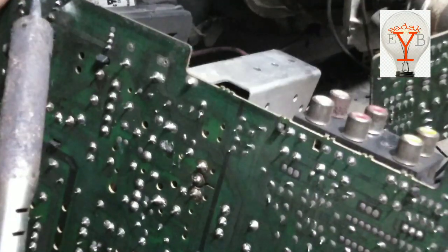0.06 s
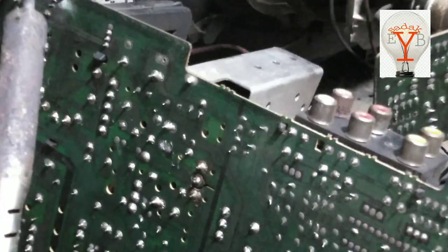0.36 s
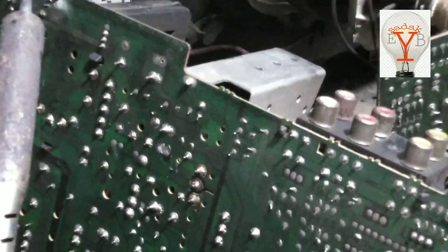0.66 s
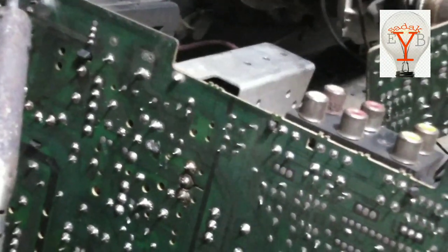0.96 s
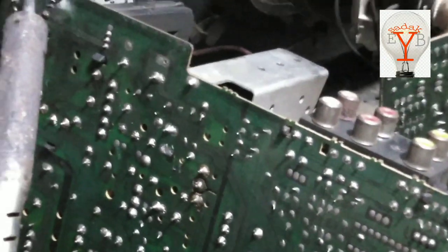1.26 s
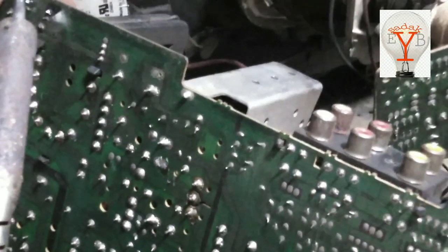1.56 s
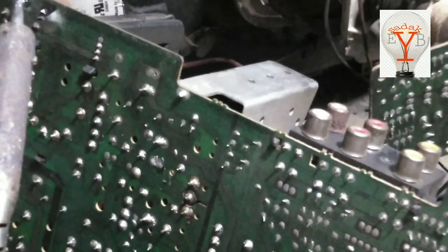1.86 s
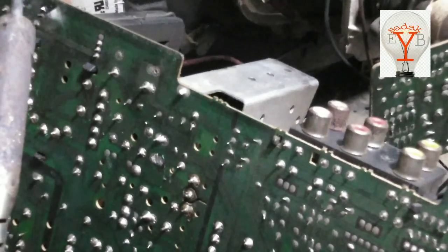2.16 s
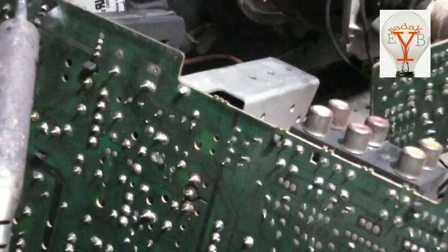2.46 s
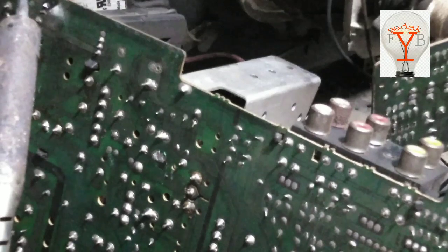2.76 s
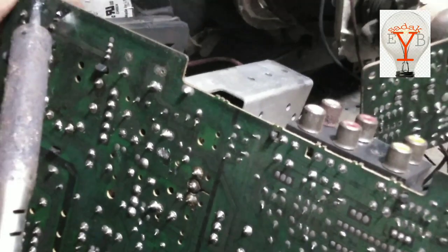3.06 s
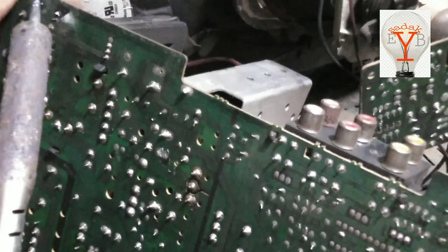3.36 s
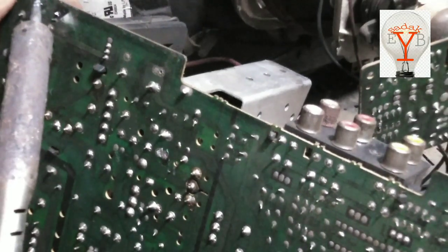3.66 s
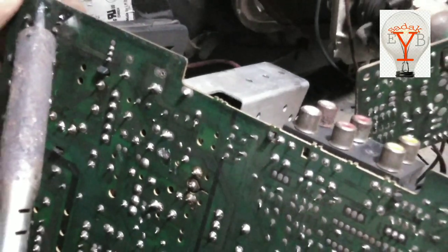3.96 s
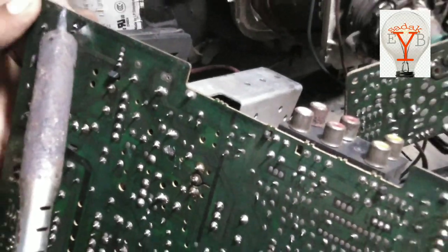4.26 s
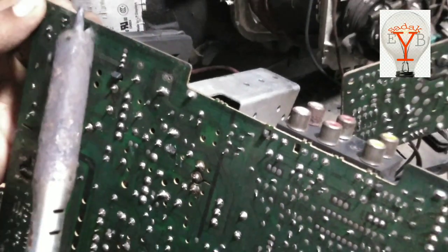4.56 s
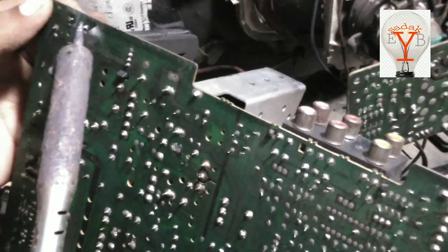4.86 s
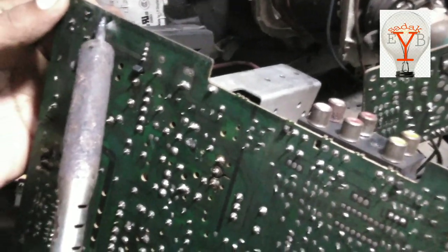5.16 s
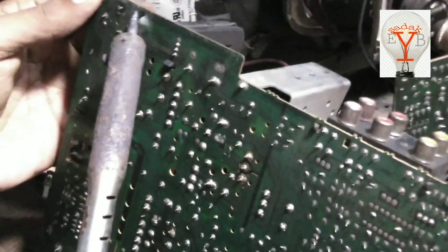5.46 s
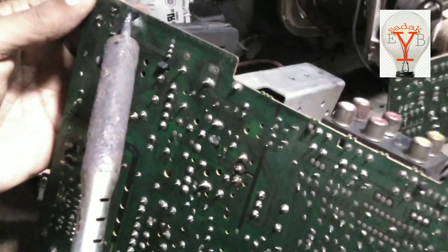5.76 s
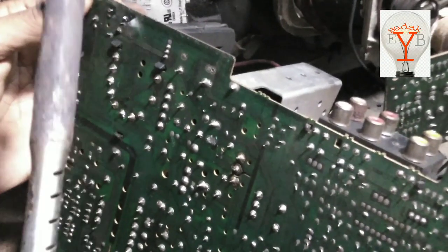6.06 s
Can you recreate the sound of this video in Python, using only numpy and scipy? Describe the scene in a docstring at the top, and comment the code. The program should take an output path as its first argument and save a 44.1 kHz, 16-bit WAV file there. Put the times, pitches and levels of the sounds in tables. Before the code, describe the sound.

Close, dry taps and short scrapes of a soldering iron on a circuit board come mostly from the right, in a quiet workshop. A sharp metallic ping ends the first cluster, then sparse soft touches lead to one loud, sharp knock near the end. On the left, crickets chirp in high, quick pulses, first near, then farther away, then near again, over very faint buzzing insects.

```python
"""A cricket chirps on the left of a hushed workshop, a few falling wing strokes a chirp.
From 0.7 s a soldering iron knocks and rubs on a circuit board close to the right microphone;
at 1.8 s its tip snaps off a pin with a ping. Light touches on the joints follow while two
farther crickets take turns. The hardest knock lands at 5.5 s, then the near cricket returns.
Thinner insects buzz far off throughout."""
import sys
import numpy as np
from scipy import signal
from scipy.fft import rfft, irfft
from scipy.io import wavfile
from scipy.ndimage import uniform_filter1d

SR = 44100
rng = np.random.default_rng(int(sys.argv[2]) if len(sys.argv) > 2 else 0)


def digitize_waveform(pressure):
    """Quantize a signal to 16-bit integers and store it at the path in sys.argv[1].

    Rows of a 2-D input are taken as channels; values are limited to [-1, 1].
    """
    field = np.atleast_2d(pressure).T
    bounded = np.clip(field, -1, 1)
    quanta = np.round(bounded * 32767).astype(np.int16)
    wavfile.write(sys.argv[1], SR, quanta)


N = 269451
TIME = np.arange(N) / SR

# board in its chassis: f/Hz, level/dB, t60/s
BOARD_MODES = [(97, -17, 0.082), (151.5, -12, 0.031), (327, -7, 0.06), (422, -11, 0.04), (497.3, -3, 0.021),
               (601.7, 0, 0.029), (726.3, -12.5, .025), (1045, -3.5, 0.026), (1335, -1.5, 0.014),
               (1475, -14, 0.019), (1882, -10, .022), (2200, -7.5, 0.014), (2500, -14, .016),
               (2790, -11, 0.014), (3200, -15, 0.016), (3800, -19, .016), (4250, -18, 0.015),
               (4950, -20, .01), (5450, -24, .014), (7500, -25, 0.0055)]
# iron and hand on the board: t/s, level/dB, f_low/Hz, f_high/Hz, pitch ratio
BOARD_KNOCKS = [(.663, -48, 90, 320, 1), (.776, -55, 200, 700, .9), (.807, -38.5, 120, 230, 1.1),
                (.8085, -44, 400, 1210, .92), (.946, -53.5, 155, 240, .9), (1.071, -55, 200, 380, .95),
                (1.140, -32, 300, 3600, 1.04), (1.1442, -20, 160, 850, 1.01), (1.152, -29, 60, 2300, 1.02),
                (1.156, -33.5, 60, 105, .96), (1.228, -50, 60, 300, 1), (1.479, -45, 60, 420, .95),
                (1.502, -31, 100, 1790, 1.03), (1.504, -36, 1050, 1600, 1.03), (1.516, -37, 95, 200, .96),
                (1.568, -41.5, 110, 640, .95), (1.594, -47, 150, 800, 1.1), (1.642, -50, 95, 950, 1.12),
                (1.722, -51, 110, 650, .93), (4.352, -61, 60, 170, 1), (5.103, -48, 350, 1100, 1.05),
                (5.197, -41, 60, 700, 1.08), (5.45, -42, 60, 380, .92), (5.464, -41, 200, 450, 1.05),
                (5.4715, -24, 700, 7000, 1), (5.4729, -15.5, 450, 4540, 1), (5.476, -28, 60, 290, .95),
                (5.517, -50, 90, 300, .9), (5.562, -48, 120, 450, 1.05), (5.665, -50, 80, 500, .95),
                (5.688, -56, 150, 420, 1), (5.859, -42.5, 140, 700, 1.04)]
def knocks():
    """Each knock rings the board, soft ones only its low modes; the hand's grip shifts the pitch."""
    out = np.zeros((2, N))
    for s, db, low_hz, high_hz, pitch in BOARD_KNOCKS:
        modes = [(hz * pitch, mode_db, t60) for hz, mode_db, t60 in BOARD_MODES]
        board = band(ring(modes, attack_s=.00025), low_hz, high_hz)
        add(out, s, blow(board, db) * mics(-40.5, 0))
    return out


# tip and pin: f/Hz, level/dB, t60/s
METAL_MODES = [(1090, -24, 0.01), (1938, -23, 0.082), (2700, -3.5, 0.029), (3240, -3.5, 0.02086),
               (3700, -2, 0.036), (4537, -10.5, 0.023), (4660, -14, .045), (5260, -12, 0.028),
               (1669, 0, .042), (2762, 0, .04), (3866, -10, .075), (6126, -18, .05), (7133, -17, .055),
               (7800, -19, .04), (8900, -20, 0.015), (11300, -37, .02)]
# snap: t/s, level/dB, left minus right/dB
PIN_SNAP = (1.8083, -20.5, -33.5)
def ping():
    """The tip snaps off a pin and both ring, so close that the sound stays dry."""
    out = np.zeros((2, N))
    s, db, pan_db = PIN_SNAP
    metal = band(ring(METAL_MODES, attack_s=.0002), 640, 12540)
    add(out, s, blow(metal, db) * mics(pan_db, 0))
    return out


# tip alone: f/Hz, level/dB, t60/s
TIP_MODES = [(1265, -2, .02), (1380, -8, .025), (2320, -18, .012)]
# touches: t/s, level/dB, joint f/Hz, joint level/dB, pin f/Hz, pin level/dB,
# thud level/dB, thud f/Hz, left minus right/dB
JOINT_TOUCHES = [(.702, -50, 1100, 8, 1800, 0, -52, 420, -44),
                 (1.706, -46, 2800, 14, 4200, 8, -59, 400, -36.5),
                 (2.177, -74, 1350, -3, 3550, -3, -96.5, 380, 5),
                 (2.716, -56, 1560, 13, 2960, -12, -90, 380, -3),
                 (2.765, -85, 1300, 0, 3000, -10, -68, 620, -25),
                 (2.841, -77, 1050, 3, 3000, -10, -61, 310, -25),
                 (3.016, -59.5, 1400, 0, 1850, -14, -46, 385, -43),
                 (3.105, -83, 1650, 0, 3420, 16, -82, 380, 7.5),
                 (3.265, -60.5, 1690, 9, 3260, 3, -92, 380, 5.5),
                 (4.011, -72.5, 1440, 0, 2900, -20, -96.5, 380, -15),
                 (4.254, -67, 1780, 4, 3030, 3, -90.5, 380, -2),
                 (4.35, -75, 1500, 0, 3500, -8, -66, 340, -19),
                 (5.05, -74, 1280, 8, 2000, -20, -85, 380, -25),
                 (5.101, -54.5, 1450, 6, 1850, -12, -46, 375, -42),
                 (5.119, -61, 1100, 4, 1900, -8, -51, 400, -34)]
def touches(grit=.16, detune=.03, settle_s=.005, joint_t60_s=.008, pin_t60_s=.009, thud_t60_s=.022):
    """The tip settles on a joint and rings with it, its pin and the hollow under the board."""
    out = np.zeros((2, N))
    contact = swell(settle_s, power=1)
    for s, db, joint_hz, joint_db, pin_hz, pin_db, thud_db, thud_hz, pan_db in JOINT_TOUCHES:
        modes = [(hz * np.exp(detune * rng.standard_normal()), mode_db, t60)
                 for hz, mode_db, t60 in TIP_MODES]
        modes.append((joint_hz, joint_db, joint_t60_s))
        modes += [(hz, pin_db, pin_t60_s) for hz in (pin_hz, pin_hz * 1.08)]  # close pair
        push = grit * contact * rng.standard_normal(SR // 10)[:len(contact)]
        push[len(push) // 2] += 1
        tip = band(signal.fftconvolve(ring(modes, attack_s=.0018), push), 950, 5000, order=6)
        thud = band(ring([(thud_hz, 0, thud_t60_s)], attack_s=.003), thud_hz * .65, thud_hz * 1.3)
        add(out, s, blow(tip, db) * mics(pan_db, 0))
        add(out, s, blow(thud, thud_db) * mics(pan_db, 0))
    return out


def taps():
    """Knocks and touches with room echoes; those away from the right microphone get more room."""
    heavy, light = knocks(), touches()
    direct = heavy + light
    heavy_echo = room(heavy[1], t60_s=.5, gap_s=.0066) * mics(-41, -26)
    light_echo = room(light[1], t60_s=.36, gap_s=.006) * mics(-36, -14)
    left_echo = room(direct[0], t60_s=.4, gap_s=.0044) * mics(-11, -14)
    return direct + heavy_echo + light_echo + left_echo


# rustles: t/s, level/dB, t60/s, length/s, crack over tail/dB, crack decay/s, f_high/Hz
BLOW_RUSTLES = [(1.143, -54.5, .5, .12, 3, .01, 3700), (1.809, -54.5, .55, .19, 13, .007, 11000),
                (5.471, -51.5, .55, .125, 17, .0048, 13800)]
def rustles():
    """A crack and a bright, lingering rustle follow the hardest blows."""
    out = np.zeros((2, N))
    t = TIME[:SR // 2]
    for s, db, t60_s, length_s, crack_db, crack_s, high_hz in BLOW_RUSTLES:
        noise = band(rng.standard_normal((2, len(t))), 500, 5500, order=1)
        grit = band(unit(band(noise, 300, 14000, order=8)), 300, high_hz)
        crack = grit * undb(crack_db) * np.exp(-t / crack_s)
        tail = grit * decay(t, t60_s) / np.hypot(1, (t / length_s) ** 8)
        add(out, s, (crack * mics(-3, 0) + tail * mics(-1.2, 0)) * undb(db))
    return out


def stick_slip(per_second, spread_db, patchy_db, places=3, detune=.08, place_db=3):
    """Uneven jerks wander between contact places, each ringing the board in its own way."""
    out = np.zeros(N)
    for _ in range(places):
        offsets = rng.standard_normal((len(BOARD_MODES), 2))
        modes = [(hz * np.exp(detune * sharp), db + 2 * loud, t60)
                 for (hz, db, t60), (sharp, loud) in zip(BOARD_MODES, offsets)]
        jerks = impulses(per_second / places)
        strength = undb(spread_db * rng.standard_normal(N) + place_db * wander(samples=1500))
        out += unit(signal.fftconvolve(jerks * strength, ring(modes, attack_s=.0001))[:N])
    return unit(out * undb(patchy_db * wander(samples=900)))


# drags: t/s, length/s, level/dB, rasp over rumble/dB
BOARD_RUBS = [(.68, .19, -57.5, -6), (.87, .57, -65, -5), (1.15, .08, -52, -7), (1.47, .13, -49, -8),
              (1.62, .19, -60, -5), (5.1, .1, -65, -3), (5.2, .26, -51.5, -10), (5.5, .2, -58, -7),
              (5.86, .1, -60, -3), (5.97, .14, -71, -8)]
def rubs(attack_s=.025, release_s=.035):
    """Hand and iron drag on the board with a low, smooth rumble and some rasp."""
    drag = stick_slip(per_second=2000, spread_db=2.5, patchy_db=1.2)
    rumble = unit(band(drag, 80, 230, order=3))
    rasp = unit(narrow(drag, 250, 780, order=3))
    out = np.zeros(N)
    for s, length_s, db, rasp_db in BOARD_RUBS:
        press = np.clip((TIME - s) / attack_s, 0, 1)
        release = np.exp(-np.maximum(TIME - s - length_s, 0) / release_s)
        out += (rumble + undb(rasp_db) * rasp) * undb(db) * press * release
    return out * mics(-26, 3.5)


# skids: t/s, length/s, level/dB, f_low/Hz, f_high/Hz, left minus right/dB
SOLDER_SCUFFS = [(.652, .032, -62, 1270, 1470, -25), (.765, .15, -64, 1100, 1480, -25),
                 (.805, .035, -74.5, 3150, 3750, 4), (.84, .055, -83, 3300, 3750, 4),
                 (1.0, .105, -61, 680, 1230, -28), (1.1, .12, -63, 1000, 1450, -28),
                 (1.338, .055, -51, 480, 1450, -28), (1.39, .085, -66, 700, 1800, -28),
                 (1.475, .06, -53, 1000, 2300, -28), (1.545, .075, -51.5, 300, 1550, -28),
                 (1.52, .27, -63.5, 900, 2400, -28), (2.795, .04, -65, 900, 1180, -22),
                 (5.2, .11, -66, 1080, 1480, -28), (5.28, .19, -62.5, 1080, 1540, -28),
                 (5.48, .17, -60, 1020, 1450, -28), (5.865, .07, -66, 1120, 1430, -25),
                 (6.05, .05, -72, 1200, 1430, -20)]
def scuffs():
    """The tip skids over solder in short, bright bursts of stick and slip."""
    skid = stick_slip(per_second=3600, spread_db=4, patchy_db=.5)
    out = np.zeros((2, N))
    for s, length_s, db, low_hz, high_hz, pan_db in SOLDER_SCUFFS:
        shape = swell(length_s, power=.45)
        grain = narrow(skid, low_hz, high_hz)[int(s * SR):][:len(shape)]
        add(out, s, unit(grain * shape[:len(grain)]) * undb(db) * mics(pan_db, 0))
    return out


# thin scratches: t/s, length/s, level/dB
GRIT_SCRATCHES = [(.808, .045, -71), (1.343, .036, -58)]
def scratches(per_second=1500, spread_db=5, ring_hz=(6300, 7400), fizz_db=-3):
    """Tiny grains catch and let go on the left, ringing high; the room carries them on."""
    grains = impulses(per_second) * undb(spread_db * rng.standard_normal(N))
    grit = unit(narrow(grains, *ring_hz, order=2)) + undb(fizz_db) * unit(narrow(grains, 5500, 13000))
    out = np.zeros(N)
    for s, length_s, db in GRIT_SCRATCHES:
        shape = swell(length_s, power=.7)
        add(out, s, unit(grit[int(s * SR):][:len(shape)] * shape) * undb(db))
    return out * mics(0, -22) + room(out, t60_s=.3, gap_s=.004) * mics(-7, -22)


# song: cricket, t/s, level/dB, opening stroke/dB, rest/s, strokes in each chirp
SONG_BOUTS = [("near", -.055, -39.8, -6.5, .1037, (2, 3, 2, 2, 3, 2)),
              ("far", 1.739, -66.5, -1.5, .102, (2, 3, 3)), ("far", 2.452, -71, -1, .102, (2,)),
              ("middle", 2.82, -52, -11, .11, (2,)), ("middle", 3.018, -48, -6, .0615, (3, 3, 3)),
              ("middle", 3.646, -47.6, -6.3, .11, (2, 2, 3, 2, 2, 2, 2, 2, 2, 2)),
              ("near", 5.674, -39.7, -10, .1045, (2, 2, 2))]
def wing_strokes(beat_s=.0442):
    """A chirp is a few evenly spaced strokes, then a rest; yields cricket, t/s, level/dB, is first."""
    for who, s, db, opening_db, rest_s, chirps in SONG_BOUTS:
        for count in chirps:
            for k in range(count):
                if -beat_s / 2 < s < N / SR:
                    yield who, s, db + (opening_db if k == 0 else 0), k == 0
                s += beat_s
            s += rest_s


# voice by cricket: f_start/Hz, fall/Hz, slide length/s, step per slide/dB, pitch drop per slide (0-1),
# room send/dB, wing f_low/Hz, wing f_high/Hz
CRICKET_VOICES = {"near": (5950, 1000, .019, 0, .026, 0, 4520, 6050),
                  "middle": (5680, 600, .016, -8, .025, 1, 4780, 5720),
                  "far": (5700, 500, .03, -2, .025, 2, 4900, 5850)}
def crickets(slide_gap_s=.0085, opening_flat=.03, bend=1.4, detune=.008, waver=.014,
             grip_db=3.5, scatter_db=1.2, lift_db=-20, lift_lead_s=.028):
    """Each wing closing is three raspy falling slides, each lower than the last; walls blur them."""
    wings = {who: np.zeros(N) for who in CRICKET_VOICES}
    teeth, grip = wander(samples=30), wander(samples=45)  # uneven teeth shake pitch and strength
    for who, s, db, opens in wing_strokes():
        start_hz, fall_hz, length_s, step_db, drop = CRICKET_VOICES[who][:5]
        slides = [(s + k * slide_gap_s, 1 - k * drop - opening_flat * opens, db + k * step_db)
                  for k in range(3)]
        if opens:  # wings brush as they lift
            slides.append((s - lift_lead_s, 1, db + lift_db))
        shape = swell(length_s, power=.6)
        glide_hz = start_hz - fall_hz * np.linspace(0, 1, len(shape)) ** bend
        for at_s, pitch, slide_db in slides:
            sharp, loud = rng.standard_normal(2)
            span = (int(at_s * SR) + np.arange(len(shape))) % N
            hz = pitch * glide_hz * (1 + detune * sharp + waver * teeth[span])
            tone = np.sin(2 * np.pi * np.cumsum(hz) / SR)
            slide = unit(shape * undb(grip_db * grip[span]) * tone)
            add(wings[who], at_s, slide * undb(slide_db + scatter_db * loud))
    direct, sent = np.zeros((2, N))
    for who, (*_, room_db, low_hz, high_hz) in CRICKET_VOICES.items():
        song = narrow(wings[who], low_hz, high_hz, order=8)  # a wing radiates only in its own band
        direct += song
        sent += song * undb(room_db)
    early = room(band(sent, 4700, 9000), t60_s=.08, gap_s=.001)
    late = room(band(sent, 5400, 9000, order=6), t60_s=.34, gap_s=.002)  # high starts linger
    return direct * mics(-4, -32.5) + early * mics(-4.5, -28) + late * mics(-2, -23)


def buzz(length_s, hz, db, width_hz):
    """A far insect on the left, blurred by echoes into a narrow swelling band."""
    shape = swell(length_s, power=.48)
    rasp = narrow(rng.standard_normal(SR), hz - width_hz / 2, hz + width_hz / 2, order=3)
    return unit(rasp[-len(shape):] * shape) * undb(db) * mics(0, -22.5)


# thin chirper: t/s, level/dB
CHIRP_LEVELS = [(.2, -74), (2.2, -81), (4.7, -84), (5.9, -77.5)]
# other insects: t/s, length/s, f/Hz, level/dB
INSECT_BUZZES = [(.078, .19, 9400, -72.5), (.31, .22, 9360, -70), (1.331, .2, 9350, -79.5),
                 (1.597, .2, 9260, -76.5), (3.0, .65, 4720, -70), (3.47, .3, 9440, -75.5),
                 (3.78, .27, 9380, -74), (4.16, .26, 9300, -75), (5.8, .19, 9450, -76.5)]
def far_insects(first_s=.175, period_s=.2738, scatter_db=2, scatter_s=.015):
    """One insect chirps thinly at a nearly even pace; others buzz now and then."""
    out = np.zeros((2, N))
    for s in np.arange(first_s, N / SR, period_s):
        late, loud = rng.standard_normal(2)
        db = np.interp(s, *np.transpose(CHIRP_LEVELS)) + scatter_db * loud
        add(out, s + scatter_s * late, buzz(length_s=.17, hz=10030, db=db, width_hz=460))
    for s, length_s, hz, db in INSECT_BUZZES:
        add(out, s, buzz(length_s, hz, db, width_hz=380))
    return out


# noise spectrum: f/Hz, level/dB
HUSH_SPECTRUM = [(20, -120), (40, -108), (70, -100.5), (120, -101), (200, -109), (400, -117), (1000, -121),
                 (4000, -124), (7000, -127), (10000, -123), (14000, -122), (14700, -148)]
def hush():
    """Room noise and microphone hiss, half common to both sides, a little stronger at first."""
    hz, db = np.transpose(HUSH_SPECTRUM)
    bins_hz = np.fft.rfftfreq(N, 1 / SR)
    colour = undb(np.interp(np.log(bins_hz + 1), np.log(hz), db)) * np.sqrt(SR / 2)
    noise = unit(rng.standard_normal((2, N)) + rng.standard_normal(N))
    gain_db = np.interp(TIME, [1.7, 2.1], [2.5, -.5])
    return irfft(rfft(noise) * colour, N) * undb(gain_db)


def room(x, t60_s, gap_s):
    """Diffuse echoes of unit energy, different at each microphone."""
    t = TIME[:SR * 3 // 4]
    echoes = rng.standard_normal((2, len(t))) * decay(t, t60_s) * np.clip(t / gap_s - 1, 0, 1)
    echoes /= np.sqrt(np.sum(echoes ** 2, axis=1, keepdims=True))
    return signal.fftconvolve(x[None], echoes, axes=1)[:, :N]


def ring(modes, attack_s):
    """Modes build up while the contact lasts, then decay."""
    t = TIME[:SR // 4]
    tones = sum(undb(db) * np.sin(2 * np.pi * hz * t) * decay(t, t60) for hz, db, t60 in modes)
    return (1 - np.exp(-t / attack_s)) * tones


def blow(x, db, window_s=.025):
    """Scale a blow so its energy, spread over the window, has rms level db."""
    return x * undb(db) / np.sqrt(np.sum(x ** 2) / (window_s * SR))


def decay(t, t60_s):
    """Exponential fall, 60 dB in t60_s."""
    return np.exp(-np.log(1000) * t / t60_s)


def swell(length_s, power):
    """Rounded rise and fall."""
    return np.hanning(int(length_s * SR)) ** power


def impulses(per_second):
    """Unit impulses of random time and sign."""
    return (rng.random(N) < per_second / SR) * rng.choice([-1, 1], N)


def wander(samples):
    """Smooth random drift of rms 1."""
    return unit(uniform_filter1d(uniform_filter1d(rng.standard_normal(N), samples), samples))


def band(x, low_hz, high_hz, order=4):
    """Butterworth high-pass, then low-pass."""
    x = signal.sosfilt(signal.butter(order, low_hz, "high", fs=SR, output="sos"), x)
    return signal.sosfilt(signal.butter(order, high_hz, fs=SR, output="sos"), x)


def narrow(x, low_hz, high_hz, order=4):
    """Steep Butterworth band-pass."""
    return signal.sosfilt(signal.butter(order, [low_hz, high_hz], "band", fs=SR, output="sos"), x)


def add(out, s, sound):
    """Mix a sound in at time s."""
    i = min(max(int(s * SR), 0), N)
    n = min(sound.shape[-1], N - i)
    out[..., i:i + n] += sound[..., :n]


def mics(left_db, right_db):
    """Microphone gains, as a column."""
    return undb([[left_db], [right_db]])


def undb(db):
    """Decibels to gain."""
    return 10 ** (np.asarray(db) / 20)


def unit(x):
    """Scale to rms 1."""
    return x / np.sqrt(np.mean(x ** 2))


def scene():
    """Work on the right, insects on the left."""
    work = taps() + ping() + rustles() + rubs() + scuffs()
    return work + scratches() + crickets() + far_insects() + hush()


def record(dry):
    """Clip at full scale, then low-pass steeply at 16.4 kHz."""
    return signal.sosfilt(signal.ellip(8, .2, 70, 16446, fs=SR, output="sos"), np.clip(dry, -1, 1))


dry = scene()
out = record(dry)
digitize_waveform(out)
```